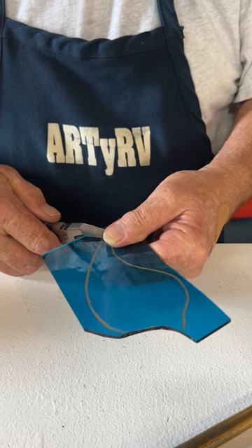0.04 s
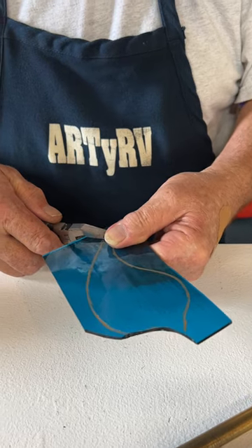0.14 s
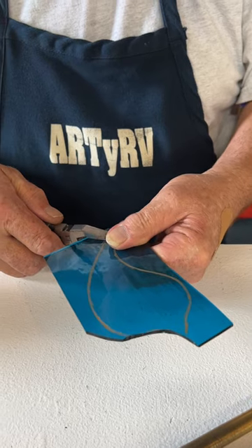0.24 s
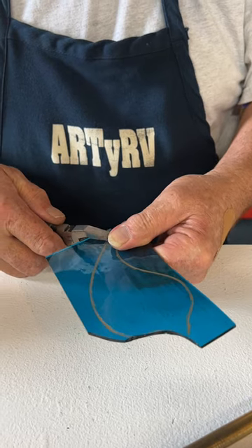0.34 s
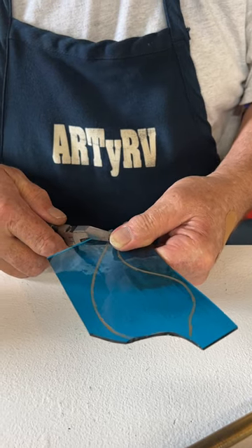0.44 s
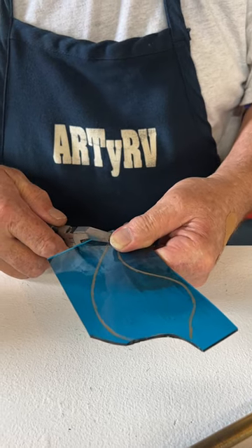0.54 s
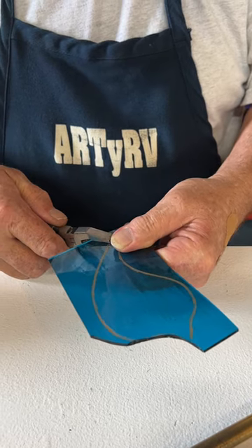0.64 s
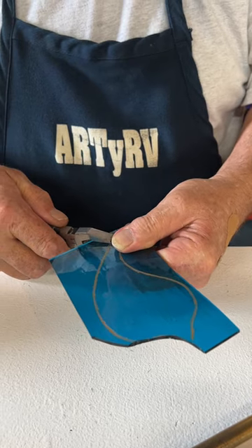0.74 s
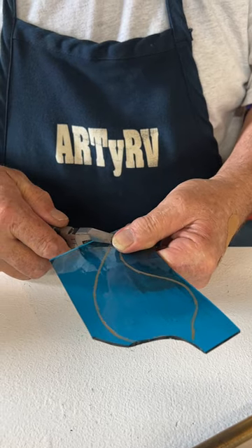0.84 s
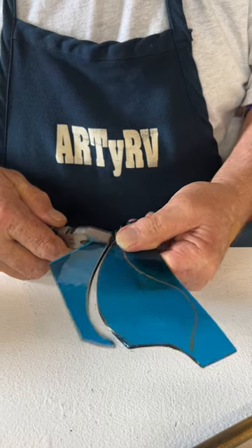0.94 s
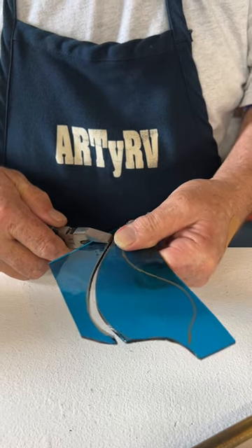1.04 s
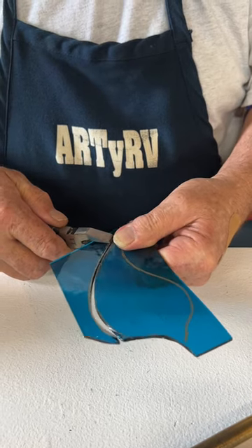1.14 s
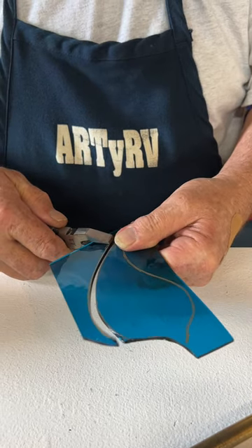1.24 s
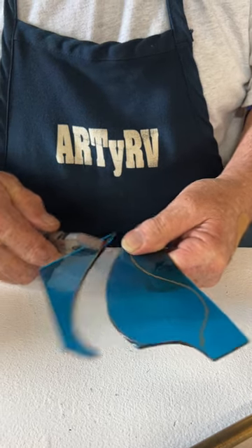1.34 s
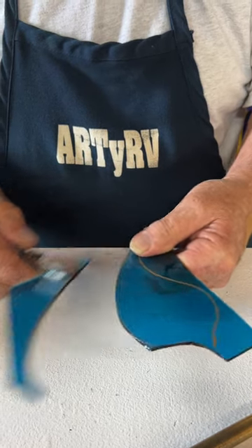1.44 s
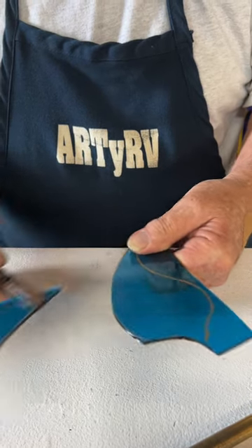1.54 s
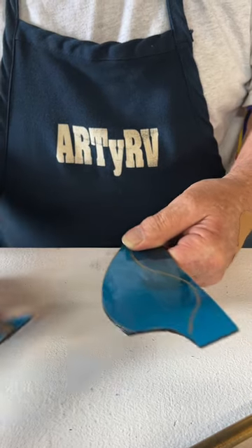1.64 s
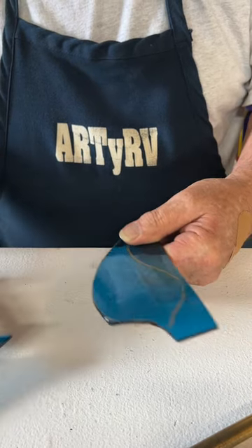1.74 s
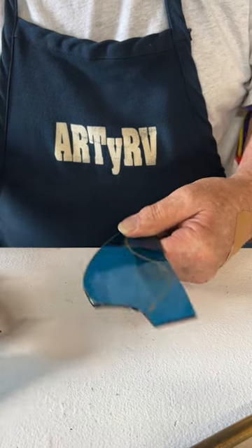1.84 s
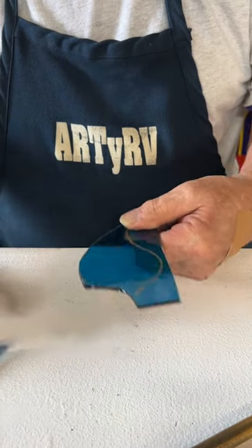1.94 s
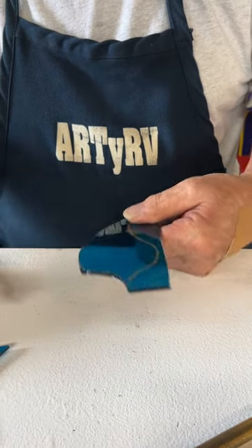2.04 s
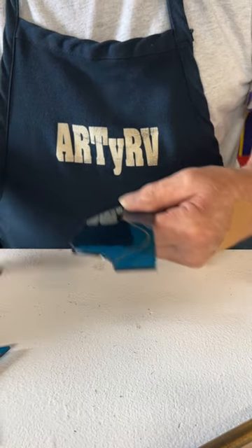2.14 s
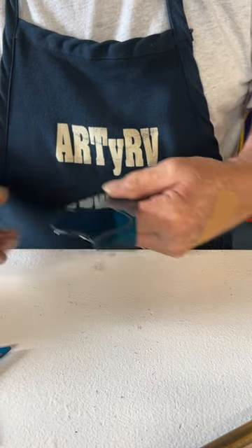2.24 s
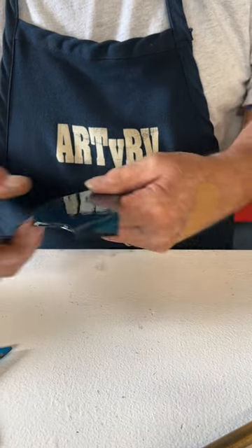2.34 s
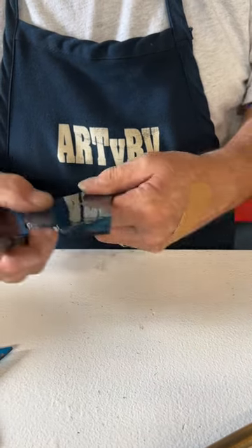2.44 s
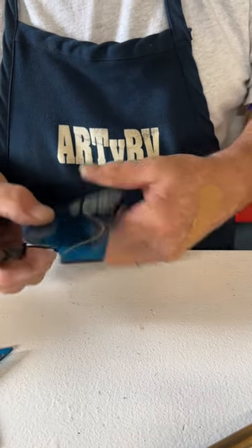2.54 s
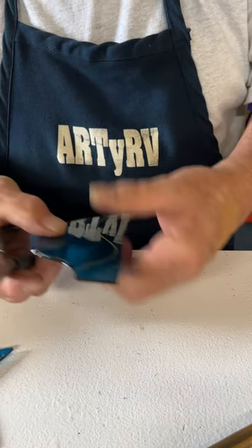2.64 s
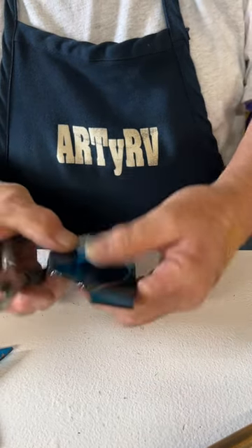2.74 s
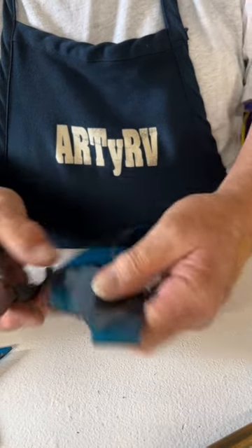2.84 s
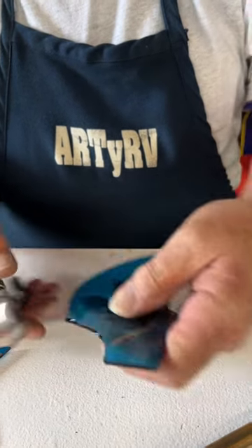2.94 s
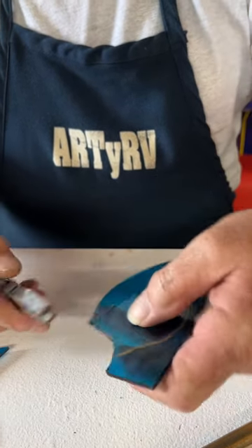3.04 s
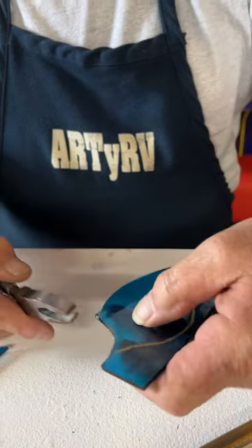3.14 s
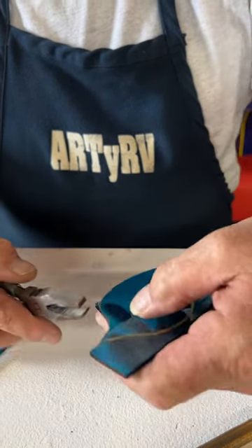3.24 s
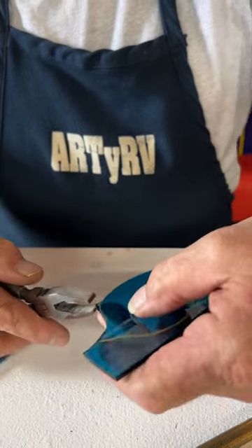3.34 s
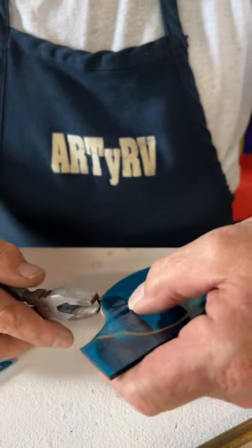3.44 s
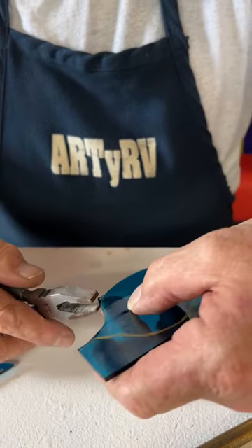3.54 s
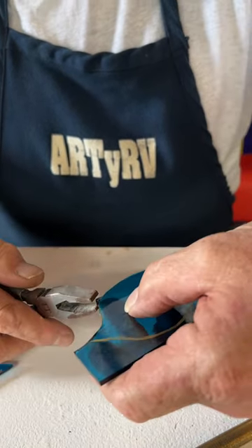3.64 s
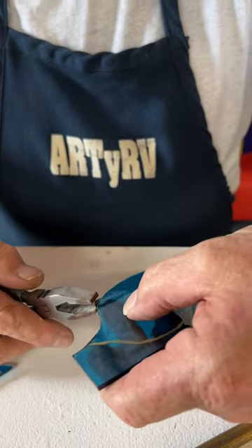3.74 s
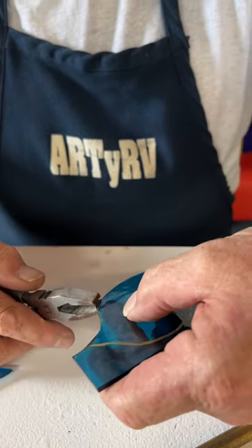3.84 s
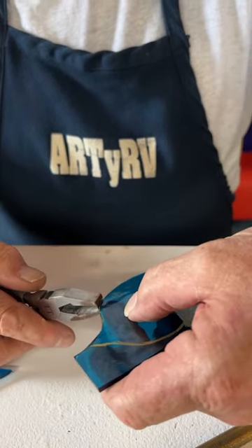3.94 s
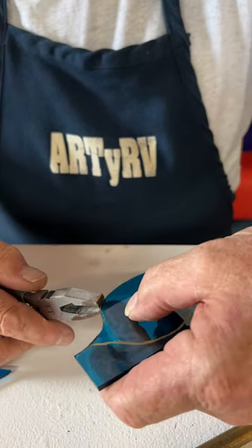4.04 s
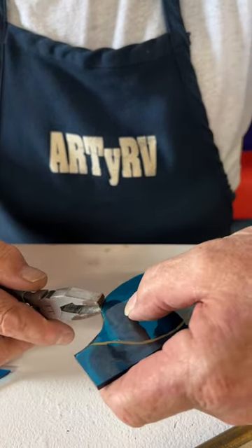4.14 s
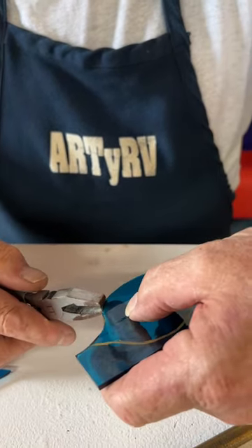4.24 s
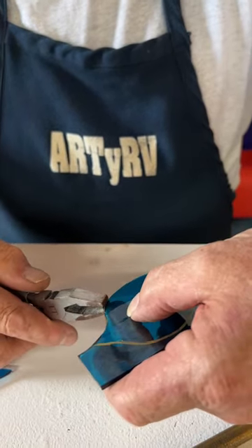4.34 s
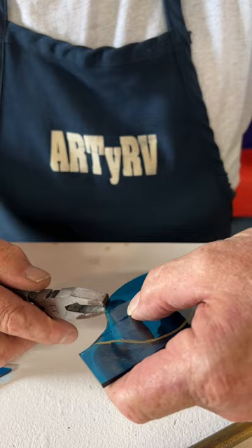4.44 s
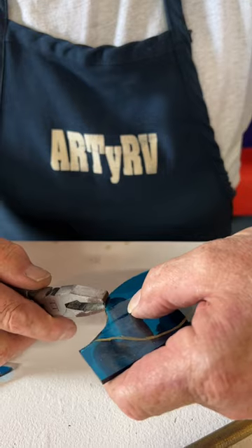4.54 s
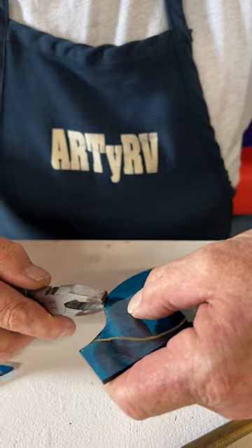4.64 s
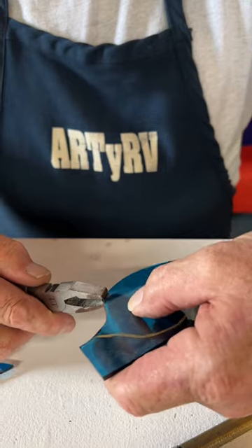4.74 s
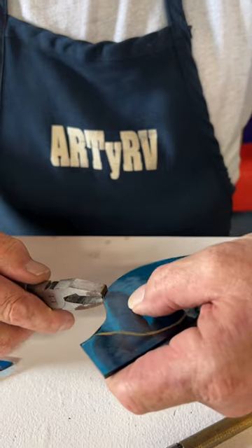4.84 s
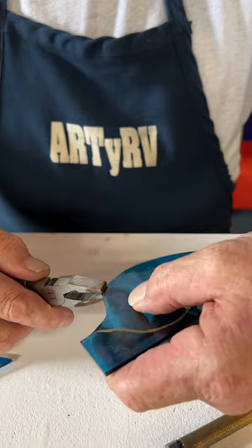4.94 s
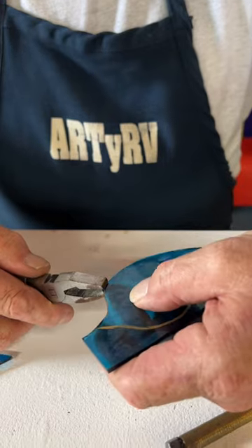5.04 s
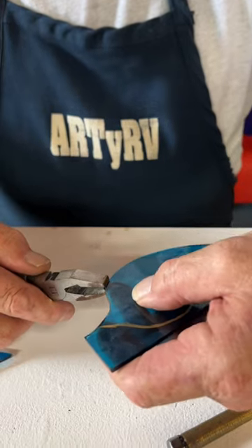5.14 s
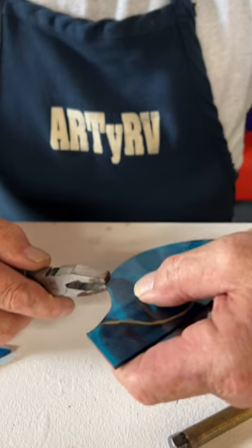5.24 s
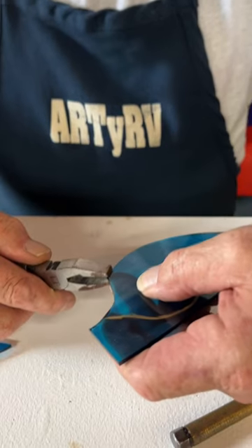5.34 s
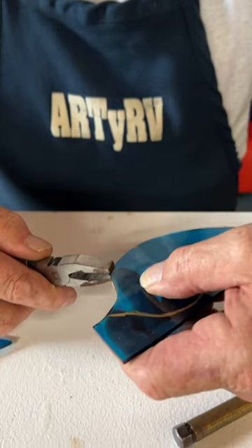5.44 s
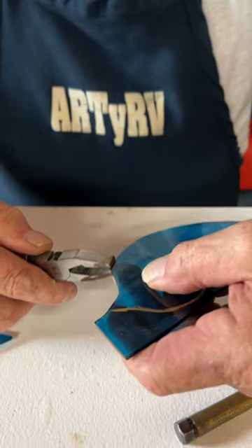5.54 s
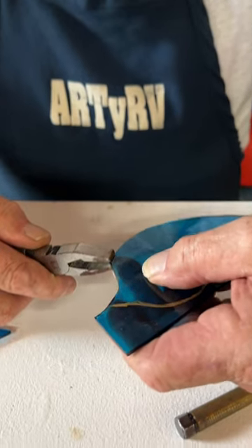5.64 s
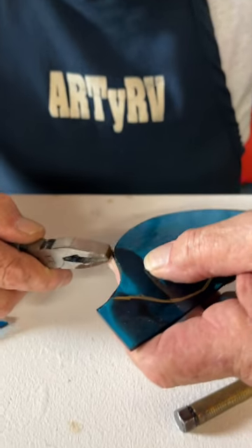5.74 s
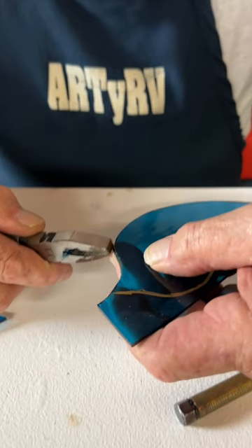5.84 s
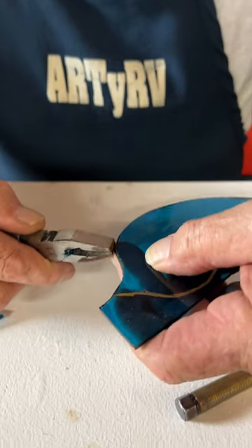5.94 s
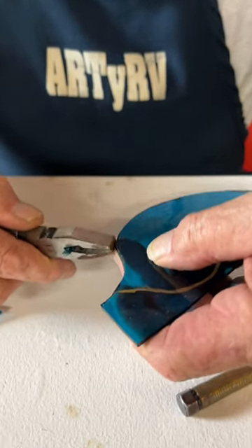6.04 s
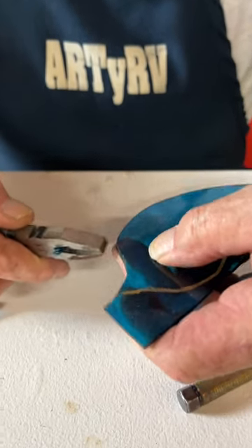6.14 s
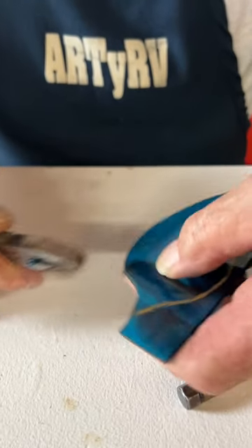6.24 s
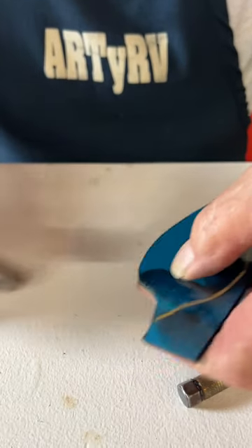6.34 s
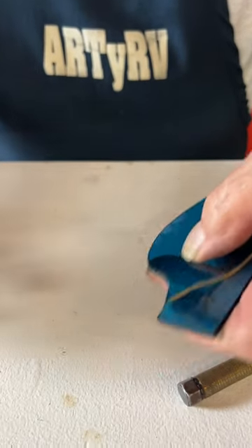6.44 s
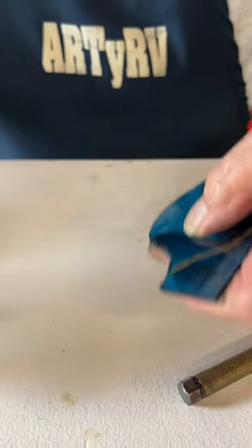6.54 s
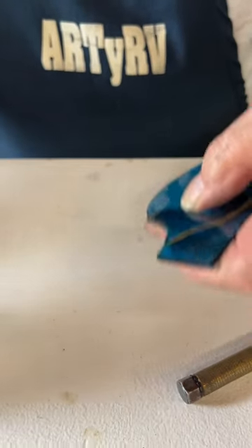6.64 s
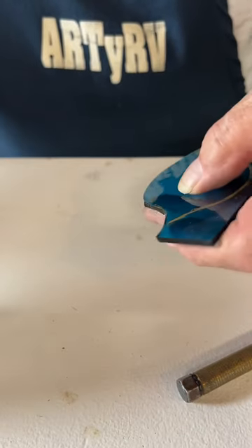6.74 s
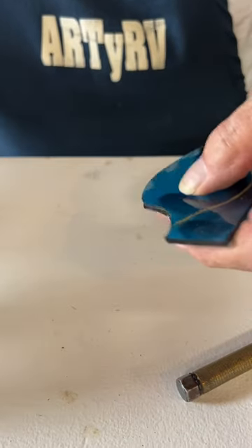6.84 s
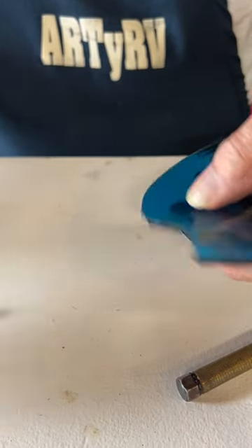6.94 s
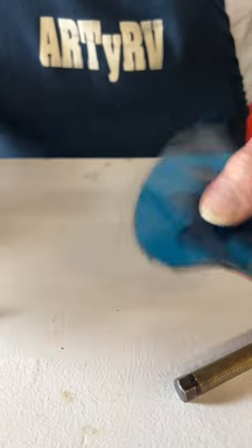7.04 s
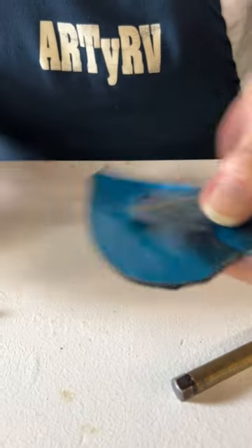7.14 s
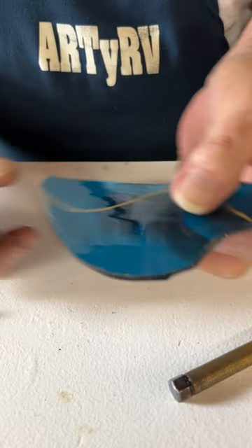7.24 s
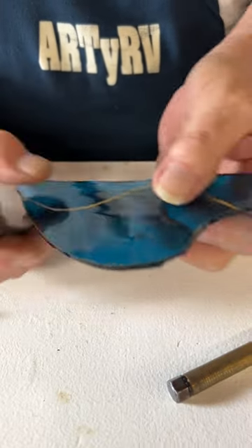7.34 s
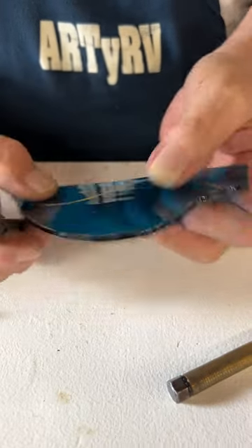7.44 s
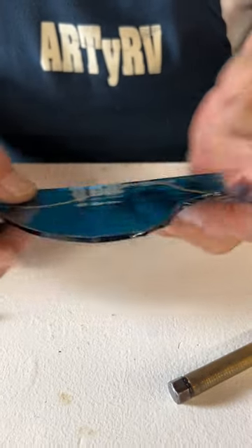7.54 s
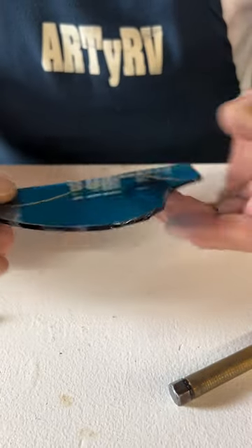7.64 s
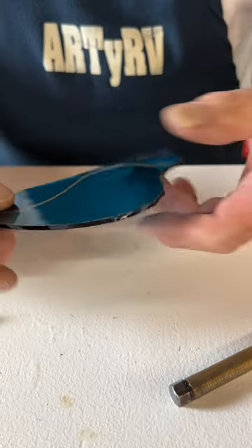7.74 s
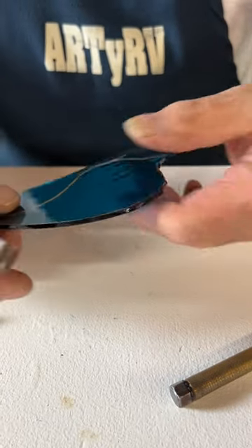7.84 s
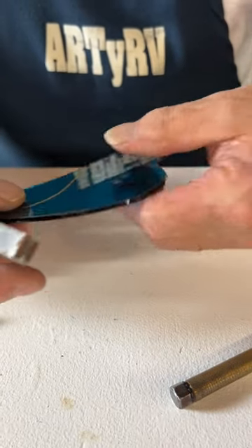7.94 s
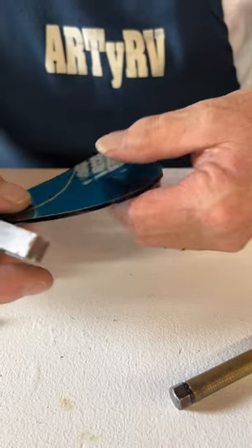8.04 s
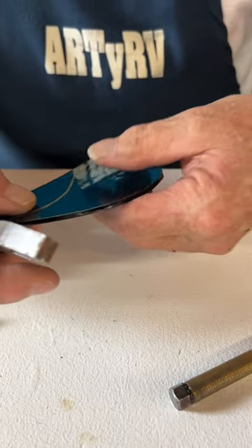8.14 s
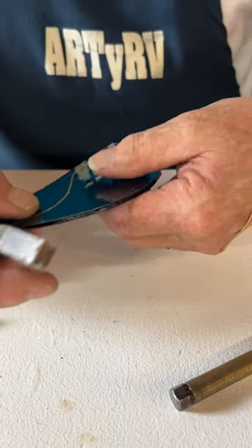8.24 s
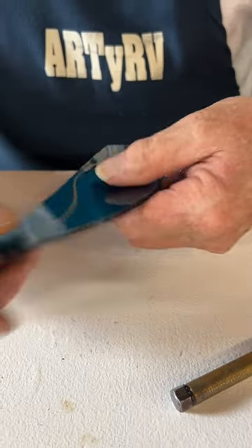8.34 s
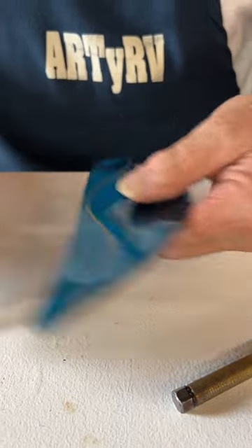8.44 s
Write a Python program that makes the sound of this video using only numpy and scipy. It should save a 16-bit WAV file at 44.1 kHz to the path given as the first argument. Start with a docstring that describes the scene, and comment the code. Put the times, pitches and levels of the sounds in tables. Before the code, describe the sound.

Over a low room rumble, a glass sheet snaps, pliers clatter onto a table, then a sharper crack breaks off a corner and splinters tick.

```python
"""Over a low studio rumble a splinter ticks, then a sheet of stained glass is snapped along its score with pliers.
The pliers clatter onto a work table and fingers rub the glass; a second pair nibbles the edge, and a hum climbs.
A corner cracks off, the second pair slides shut and is laid down, splinters skip about and fingers rub again.
Glass and steel are bursts of spiky noise plus dying tones; the board adds lower tones; rubbing is grainy noise.
Each tool blow is one handle then the other, shared between steel and board by how flat it lands; bounces follow."""
import sys
import numpy as np
from scipy import signal
from scipy.fft import rfft, irfft, next_fast_len
from scipy.io import wavfile
from scipy.ndimage import map_coordinates

SR = 44100
rng = np.random.default_rng(int(sys.argv[2]) if len(sys.argv) > 2 else 0)


def unload_audio(sound):
    """Save the sound as a 16-bit wav file, at the path given as the first command line argument."""
    columns = np.transpose(np.atleast_2d(sound))
    # keep every value between -1 and 1, then stretch to whole-number steps
    steps = np.round(np.clip(columns, -1, 1) * 32767)
    wavfile.write(sys.argv[1], SR, steps.astype(np.int16))


N = 374850  # length in samples
TOP_HZ = 16500  # upper edge of the sound

# Levels and ring times in the tables are starting points: the functions trim, tilt or scale them.
# Low steady rumble: pitch_hz, level_db (per Hz, relative)
RUMBLE_SPECTRUM = [(18, -42), (28, -25.5), (40, -6), (55, -2.5), (125, -1), (240, -6), (310, -18.5),
                   (500, -25), (1000, -35), (2000, -41.5), (4000, -46), (9000, -47), (13000, -61.5),
                   (16000, -71)]
# Path of the faint hum: time_s, pitch_hz, level_db
HUM_PATH = [(4.25, 150.6, -61.5), (4.499, 150, -53), (4.95, 160.8, -52.5), (5.1, 163, -60.5),
            (5.35, 169.1, -54), (5.502, 172.5, -73)]
# Reverberation of the studio: pitch_hz, decay_s (time to fall 60 dB)
ROOM_DECAY = [(120, 0.45), (500, .75), (1000, .85), (1700, .9), (2500, 0.91), (5500, .63), (9000, 0.62),
              (13000, .3)]
# Tone colour of the reverberation: pitch_hz, level_db
ROOM_COLOUR = [(120, 5), (500, 2), (1000, 1.5), (1600, 0.5), (2600, -3), (3600, -3), (5000, -2),
               (10500, -2.5), (12500, -3.5), (15000, -4)]
# Echoes from near surfaces: delay_s, level_db
WALL_ECHOES = [(0.0127, -18.5), (.0245, -30), (.029, -23), (.052, -40.5)]
# How alike left and right are in diffuse sound: pitch_hz, likeness (no unit, 1 = same)
LEFT_RIGHT_LIKENESS = [(100, .989), (250, .95), (600, 0.3), (1400, .4), (2500, 0.35), (5500, .55),
                       (10000, 0.3)]
# Level difference of the microphone ports: pitch_hz, left_minus_right_db
PORT_LEVEL = [(250, 0.3), (620, 3.3), (1200, 1.1), (3000, .7), (6000, 0.56), (10000, .1)]
# Phase difference of the microphone ports: pitch_hz, left_lead_rad
PORT_LEAD = [(200, 0), (700, .2), (2500, 0), (5500, -.95), (9000, -1.3), (15000, -1.55)]

# Air moved by the swaying glass: pitch_hz, level_db (per Hz, relative)
SWAY_SPECTRUM = [(20, -26), (45, -2.5), (75, 0.5), (160, -3.5), (300, -22.5), (1000, -90)]
SWAY_START_S, SWAY_LENGTH_S, SWAY_DB = .885, .33, -51.5

# Fingers slide on the glass: start_s, length_s, hiss_db, ring_db
FINGER_RUBS = [(2.42, 0.21, -70, -68), (2.52, 0.52, -71.5, -81), (3.191, 0.29, -67, -72),
               (4.679, .32, -81, -100), (6.97, 0.15, -68.5, -52), (7.218, 0.28, -72.5, -80),
               (7.87, 0.22, -84.5, -81), (8.25, 0.095, -77, -71), (8.41, .09, -83, -76)]
# A tight grip squeaks: start_s, length_s, pitch_hz, level_db
FINGER_SQUEAKS = [(2.47, 0.18, 1032, -67), (3.2, 0.12, 4950, -65), (6.99, 0.18, 1528, -70),
                  (8.26, 0.11, 1007, -72)]
# The second pliers' jaws slide shut: start_s, length_s, hiss_db, ring_db
JAW_SLIDES = [(6.06, 0.19, -62, -60.5)]
# The jaws scrape: start_s, length_s, pitch_hz, level_db
JAW_SCRAPES = [(6.125, 0.061, 1580, -54)]
# Hiss of a rubbed surface: pitch_hz, level_db (per Hz, relative)
RUB_SPECTRUM = [(300, -35), (1500, -5.5), (3000, 0), (5000, -5.5), (9000, -3), (11000, -3.5), (12300, -52),
                (14800, -8), (16000, -41)]
# Tones of the hand-held glass: pitch_hz, level_db, ring_s (time to fall 60 dB)
HELD_GLASS_TONES = [(2630, -1, 0.011), (3968, -10, 0.061), (5020, 3.5, 0.016), (5220, -14.5, 0.015),
                    (5820, -5, 0.031), (7970, 4, 0.015), (8680, 5, 0.0077), (11050, -8, .012),
                    (14700, -15, 0.014)]

# Splinters click off the edge and skip about: start_s, level_db, treble_db
SPLINTER_TICKS = [(0.6715, -45, 21), (2.5042, -39.5, 8), (2.6708, -52, -39), (3.2004, -48, -32),
                  (4.6815, -41, 1), (6.4928, -22.5, -21), (6.5012, -19.5, 0), (6.541, -30, -13.5),
                  (6.559, -27.5, -61), (6.6177, -25, -22), (6.6659, -31, -30)]
# Splinter tick: pitch_hz, level_db (per Hz, relative)
TICK_SPECTRUM = [(200, -11.5), (900, 0), (2700, -2), (4000, 3), (7000, 1), (10500, 0.5), (12500, -9),
                 (16000, -9)]
# The last crumbs: start, typical spacing, first level and loss per hop
SKITTER_START_S, SKITTER_GAP_S, SKITTER_DB, SKITTER_LOSS_DB = 6.646, .032, -38, 6.5

# First pliers tumble onto the table or stir when it is bumped:
# start_s, steel_db, table_db, flatness (no unit, 0 = on a tip, 1 = flat)
PLIERS_BLOWS = [(1.27, -56, -46, .9), (1.6875, -18.5, -24, 1), (1.716, -16, -29, 0.49),
                (1.7195, -16.5, -27, 0.81), (1.778, -23.5, -30.5, 0.025), (1.809, -21, -30.5, 0.073),
                (1.825, -21, -23.5, 0.32), (1.838, -17.5, -31, .05), (1.861, -23, -26.5, 0.077),
                (1.9232, -24, -25, 0.45), (1.9325, -13.5, -32.5, 0.19), (1.9365, -17.5, -32.5, .3),
                (1.984, -15, -21, .75), (4.571, -50, -45.5, 0.88)]
# Second pliers jerk down as the corner gives and are later laid down: same columns
NIPPER_BLOWS = [(5.7105, -18, -26, 0.89), (5.743, -23, -31, .6), (5.7495, -18.5, -35, .9),
                (6.207, -43.5, -43, 0.57), (6.2184, -37, -36.5, 0.84), (6.2439, -21.5, -31.5, 0.53)]
# First pliers rock to rest: start_s, steel_db, table_db, flatness (no unit, 0-1), first_bounce_s
PLIERS_SETTLE = [(1.999, -25, -24, .5, .027), (3.301, -48.5, -36, 0.46, .031)]
# Second pliers rock to rest: same columns
NIPPER_SETTLE = [(6.251, -29.5, -31, 0.79, .017)]
# Steel tones of the first pliers: pitch_hz, level_db, ring_s
PLIERS_TONES = [(2550, -13, .14), (2930, -20, .08), (3905, -19, .1), (5210, -8, .13), (6178, 0, .2),
                (8160, -3, .16), (8820, -17, .07), (9353, -2, .15), (10506, -7, .11), (12888, -7, .13),
                (14600, -9, .14)]
# Steel tones of the second pliers: same columns
NIPPER_TONES = [(2590, -7, .08), (3950, -15, .05), (5750, -13, .09), (6210, -4, .13), (6322, 0, .19),
                (8290, -8, .12), (10580, -7, .11), (13080, -9, .11), (14700, -16, .1)]
# Table top under a hard blow: pitch_hz, level_db, ring_s
KNOCK_TONES = [(360, -3, 0.084), (463, -2, 0.07), (620, -3.5, 0.065), (674, 1.5, 0.08), (806, -1.5, 0.037),
               (920, -8, 0.038), (1309, -7.5, 0.035), (1568, -8.5, 0.026), (1750, -5, 0.031),
               (2030, -6.5, 0.036)]
# Table top under a heavy blow: same columns
THUMP_TONES = [(138.4, -4, .12), (179.5, -0.5, .1), (260.1, -1, 0.12), (306.7, -4.5, 0.084)]
# Click of steel on the table: pitch_hz, level_db (per Hz, relative)
CLICK_SPECTRUM = [(20, -45), (100, -9), (500, 4), (1500, -4), (3000, -3.5), (4200, -1), (7000, -1.5),
                  (10500, -2), (12000, -13.5), (15000, -16.5), (16500, -27)]
BOUNCE_SHRINK, BOUNCE_LOSS_DB = .8, 5  # each bounce against the last: length factor, level loss
# The other handle follows each blow: typical delay, its random spread (log scale), level change
HANDLE_LAG_S, HANDLE_LAG_SCATTER, HANDLE_DB = .0098, .12, -7.5
# On a tip the steel rings louder but a little shorter, and the board hardly moves: dB, length factor, dB
TIP_RING_DB, TIP_RING_LENGTH, TIP_THUMP_DB = 5, 0.58, -14.5
# Landing flat the steel rings more weakly but a little longer, and the board thumps harder: same units
FLAT_RING_DB, FLAT_RING_LENGTH, FLAT_THUMP_DB = -10.5, 0.7, 0

# The jaws bite the gripped piece: start_s, crack_db, ring_db, ring_length (factor), treble_tilt_db
EDGE_BITES = [(3.7046, -36, -37.5, 0.98, -18), (3.709, -52.5, -38.5, 0.61, -30),
              (3.982, -54, -47, 0.57, -47), (5.6868, -5, -5.5, 0.89, 2.5), (5.6905, -26, -17.5, 0.6, -3)]
# The sheet parts and its halves touch: same columns
SHEET_BREAK = [(.8826, -15, -28, .5, 2), (.885, -10, -15.5, .9, -2), (1.064, -34, -44, .7, -9),
               (1.066, -30, -40, .6, -45), (1.269, -58, -62, .4, -22), (1.543, -55, -51, .3, -12)]
# Tones of the gripped piece: pitch_hz, level_db, ring_s
PIECE_TONES = [(2477, -2, 0.03), (2780, -8, .025), (4920, 3, 0.014), (5700, -8.5, 0.01), (6800, -6, 0.014),
               (7640, -4, .012), (8540, -5.5, 0.02), (11100, -0.5, 0.013)]
# Tones of the sheet: same columns
SHEET_TONES = [(1389, -17.5, .22), (2280, -12, .04), (2402, -9, .06), (2449, 0, .085), (2800, -13, .04),
               (5300, -9, .05), (5398, -3, .1), (5620, -6, .045), (9205, -11, .05), (14900, -20, .12)]
# Cracking glass: pitch_hz, level_db (per Hz, relative)
CRACK_SPECTRUM = [(20, -59.5), (150, -32.5), (500, -21.5), (900, -10.5), (1400, -11), (2500, -8),
                  (3800, -9), (5500, -4.5), (8000, -4), (11000, -2.5), (12500, -14), (15000, -10.5),
                  (16500, -26.5)]


def amp(db):
    """Turn decibels into an amplitude factor."""
    return 10 ** (np.asarray(db) / 20)


def unit(x):
    """Scale a sound to an average (rms) level of 1."""
    return x / np.sqrt(np.mean(x ** 2) + 1e-20)


def along(points, hz):
    """Read a curve of (pitch_hz, value) points, spaced by the logarithm of pitch."""
    f, v = np.transpose(points)
    return np.interp(np.log(hz + 1), np.log(f + 1), v)


def fade(t, t60):
    """Die away smoothly, losing 60 dB in t60 seconds."""
    return np.exp(-np.log(1000) * t / np.maximum(t60, 1e-4))


def filtered(x, response):
    """Multiply the spectrum of a sound by a response to pitch."""
    n = x.shape[-1]
    padded = next_fast_len(n + 8192)
    spectrum = rfft(x, padded) * response(np.fft.rfftfreq(padded, 1 / SR))
    return irfft(spectrum, padded)[..., :n]


def noise(spectrum, size):
    """Make coloured noise with an rms of 1."""
    return unit(filtered(rng.standard_normal(size), lambda hz: amp(along(spectrum, hz))))


def tilted(rows, tilt_db):
    """Tilt a spectrum or set of tones by an amount that reaches tilt_db at TOP_HZ."""
    return [(hz, db + tilt_db * hz / TOP_HZ, *rest) for hz, db, *rest in rows]


def add(track, s, sound):
    """Mix a sound into the track at time s."""
    part = track[max(round(s * SR), 0):][:len(sound)]
    part += sound[:len(part)]


def ages():
    """Time since a contact, for the third of a second that it sounds."""
    return np.arange(SR // 3) / SR


def burst(spectrum, t60, spiky_db=6.5):
    """An impact of sharp, uneven noise spikes that starts near rms 1 and dies at once."""
    shape = fade(ages(), t60)
    unevenness = amp(spiky_db * rng.standard_normal(len(shape)))
    spikes = rng.standard_normal(len(shape)) * unevenness
    coloured = filtered(spikes * shape, lambda hz: amp(along(spectrum, hz)))
    return unit(coloured) * np.sqrt(np.mean(shape ** 2))


def ring(modes, length, attack, scatter_db, detune=0):
    """Dying tones of joint rms 1; each contact mixes them anew and may shift them a little."""
    hz, db, t60 = np.transpose(modes)[:, :, None]
    t = ages()
    size = amp(db + scatter_db * rng.standard_normal(hz.shape))
    hz = hz * (1 + detune * rng.standard_normal(hz.shape))
    waves = np.sin(2 * np.pi * (hz * t + rng.random(hz.shape))) * fade(t, t60 * length)
    level = np.sqrt(2 / np.sum(size ** 2))
    onset = 1 - np.exp(-t / attack)
    return (size * waves).sum(0) * level * onset


def wobble(t, rate):
    """A random curve of straight lines between rate points a second."""
    return map_coordinates(rng.standard_normal(len(t)), [t * rate], order=1)


def stroke(t, length):
    """A hand movement swells and dies away."""
    return np.sin(np.pi * np.clip(t / length, 0, 1) ** .8)


def diffuse(pair):
    """Blend two unrelated signals into left and right with the wanted likeness at each pitch."""
    def shares(hz):
        turn = np.arccos(np.clip(along(LEFT_RIGHT_LIKENESS, hz), -1, 1)) / 2
        return np.array([np.cos(turn), np.sin(turn)])
    mid, side = filtered(pair, shares)
    return np.array([mid + side, mid - side])


def studio(x, wet_db, walls_db, build=0.024):
    """The direct sound, a few near echoes, and a noise tail that dies at its own pace at each pitch."""
    hz, t, z = signal.stft(rng.standard_normal((2, SR)), SR, nperseg=256)
    decay = fade(t, along(ROOM_DECAY, hz)[:, None])
    buildup = 1 - np.exp(-(t / build) ** 2)
    tail = signal.istft(z * decay * buildup, SR, nperseg=256)[1]
    tail = diffuse(tail / np.linalg.norm(tail[0]))
    tail = filtered(tail, lambda f: amp(along(ROOM_COLOUR, f)))
    near = x.copy()
    for delay, db in WALL_ECHOES:
        add(near, delay, amp(db + walls_db) * x)
    return near + amp(wet_db) * signal.fftconvolve(x[None], tail, axes=1)[:, :N]


def background(rumble_db=-56.5, hum_db=-1):
    """Steady low noise makes the rumble; for a while a faint sine hum climbs in pitch."""
    t = np.arange(N) / SR
    s, hz, db = np.transpose(HUM_PATH)
    swell = np.interp(t, [s[0] - .2, *s, s[-1] + .2], [0, *amp(db + hum_db), 0])
    hum = swell * np.sin(2 * np.pi * np.cumsum(np.interp(t, s, hz)) / SR)
    rumble = diffuse(np.array([noise(RUMBLE_SPECTRUM, N), noise(RUMBLE_SPECTRUM, N)]))
    return amp(rumble_db) * rumble + hum


def sway():
    """A soft low flutter of air as the freed half of the sheet swings in the hand."""
    out, t = np.zeros(N), np.arange(SR // 2) / SR
    air = stroke(t, SWAY_LENGTH_S) * noise(SWAY_SPECTRUM, len(t))
    add(out, SWAY_START_S, amp(SWAY_DB) * air)
    return out


def friction(strokes, modes, grain_db, slips_per_s):
    """A surface sticks and slips: a grainy hiss, and rough noise that excites the body's tones."""
    out, t = np.zeros(N), np.arange(SR // 2) / SR
    for s, length, hiss_db, ring_db in strokes:
        slips = stroke(t, length) * unit(amp(grain_db * wobble(t, slips_per_s)))
        body = ring(modes, 0.53, attack=0.0019, scatter_db=6.5)
        push = stroke(t, length) * slips * rng.standard_normal(len(t))
        rung = signal.fftconvolve(push, body / np.linalg.norm(body))
        add(out, s, amp(hiss_db) * slips * noise(RUB_SPECTRUM, len(t)))
        add(out, s, amp(ring_db) * rung)
    return out


def squeaks(strokes, width, grain_db, slips_per_s):
    """Slips that lock to one pitch: a narrow noise band squeaks, a wide one scrapes."""
    out, t = np.zeros(N), np.arange(SR // 2) / SR
    for s, length, pitch_hz, db in strokes:
        hiss = rng.standard_normal(len(t))
        band = unit(filtered(hiss, lambda hz: 1 / (1 + ((hz / pitch_hz - 1) / width) ** 2)))
        grain = unit(amp(grain_db * wobble(t, slips_per_s)))
        add(out, s, amp(db) * stroke(t, length) * grain * band)
    return out


def skitter(treble_db=-25, unevenness=0.17, count=4):
    """The last crumbs hop at uneven gaps, ever more weakly: rows like the splinters'."""
    gaps = SKITTER_GAP_S * np.exp(unevenness * rng.standard_normal(count))
    return [(SKITTER_START_S + gaps[:k].sum(), SKITTER_DB - k * SKITTER_LOSS_DB, treble_db)
            for k in range(count)]


def splinters(gain_db=-7, t60=0.016, tilt=0.45, usual_db=-18):
    """Tiny dry noise ticks, each with its own brightness."""
    out = np.zeros(N)
    for s, db, treble_db in SPLINTER_TICKS + skitter():
        colour = tilted(TICK_SPECTRUM, tilt * (treble_db - usual_db))
        add(out, s, amp(db + gain_db) * burst(colour, t60))
    return out


def contact(s, steel_db, table_db, flatness):
    """Share out a blow by flatness: start, ring dB, ring length factor, click dB, knock dB, thump dB."""
    def between(tip, flat):
        return np.interp(flatness, [0, 1], [tip, flat])
    ring_db = steel_db + between(TIP_RING_DB, FLAT_RING_DB)
    length = between(TIP_RING_LENGTH, FLAT_RING_LENGTH)
    thump_db = table_db + between(TIP_THUMP_DB, FLAT_THUMP_DB)
    return s, ring_db, length, steel_db, table_db, thump_db


def tumble(blows, settles, count=5):
    """List a tool's contacts: one handle then the other, and ever quicker, weaker bounces to rest."""
    out = []
    for s, steel_db, table_db, flatness in blows:
        lag = HANDLE_LAG_S * np.exp(HANDLE_LAG_SCATTER * rng.standard_normal())
        out.append(contact(s, steel_db, table_db, flatness))
        out.append(contact(s + lag, steel_db + HANDLE_DB, table_db + HANDLE_DB, flatness))
    for s, steel_db, table_db, flatness, flight in settles:
        for k in range(count):
            loss = k * BOUNCE_LOSS_DB
            out.append(contact(s, steel_db - loss, table_db - loss, flatness))
            s += flight * BOUNCE_SHRINK ** k
    return out


def chatter(sound, share, t60, per_s=260):
    """The loose joint strikes again and again just after a blow, roughening its sound."""
    t = ages()
    hits = rng.random(len(t)) < per_s / SR
    taps = hits * rng.standard_normal(len(t)) * fade(t, t60) * share
    taps[0] = 1  # the blow itself
    rough = signal.fftconvolve(sound, taps)[:len(t)]
    return rough * np.linalg.norm(sound) / np.linalg.norm(rough)


def clatter(contacts, modes, click_t60):
    """Steel hits the table: clicks, and apart from them the tool's ring with the board's knock and thump."""
    clicks, body = np.zeros((2, N))
    for s, ring_db, length, click_db, knock_db, thump_db in contacts:
        click = amp(click_db) * burst(CLICK_SPECTRUM, click_t60)
        steel = amp(ring_db) * ring(modes, length, attack=0.00036, scatter_db=3, detune=.0022)
        knock = amp(knock_db) * ring(KNOCK_TONES, 0.96, attack=0.00093, scatter_db=3, detune=0.035)
        thump = amp(thump_db) * ring(THUMP_TONES, 0.81, attack=0.0014, scatter_db=.5, detune=0.021)
        add(clicks, s, chatter(click, share=0.4, t60=0.08))
        add(body, s, chatter(steel, share=0.36, t60=0.1) + knock + thump)
    return clicks, body


def tool(blows, settles, modes, click_t60, click_wet_db, body_wet_db, walls_db):
    """Pliers in the room: clicks, and the steel's ring with the board, each with its own reverberation."""
    clicks, body = clatter(tumble(blows, settles), modes, click_t60)
    return studio(clicks, click_wet_db, walls_db) + studio(body, body_wet_db, walls_db)


def fractures(events, modes, crack_t60):
    """A running crack lets go of the bent glass: a spiky burst, and tones that soon die in the hand."""
    out = np.zeros(N)
    for s, crack_db, ring_db, length, tilt_db in events:
        crack = burst(tilted(CRACK_SPECTRUM, tilt_db), crack_t60)
        glass = ring(tilted(modes, tilt_db), length, attack=0.00018, scatter_db=1.0)
        add(out, s, amp(crack_db) * crack)
        add(out, s, amp(ring_db) * glass)
    return out


def scene():
    """Place every source in the studio and mix them."""
    fingers = friction(FINGER_RUBS, HELD_GLASS_TONES, grain_db=4.0, slips_per_s=150)
    fingers += squeaks(FINGER_SQUEAKS, width=0.0082, grain_db=1.5, slips_per_s=80)
    jaws = friction(JAW_SLIDES, NIPPER_TONES, grain_db=4.5, slips_per_s=85)
    jaws += squeaks(JAW_SCRAPES, width=1.0, grain_db=1.5, slips_per_s=286)
    small = studio(splinters() + fingers + jaws, wet_db=-18.5, walls_db=-3.5)
    nippers = tool(NIPPER_BLOWS, NIPPER_SETTLE, NIPPER_TONES, click_t60=.024,
                   click_wet_db=-18.5, body_wet_db=-20.5, walls_db=-4)
    pliers = tool(PLIERS_BLOWS, PLIERS_SETTLE, PLIERS_TONES, click_t60=0.026,
                  click_wet_db=-12.5, body_wet_db=-18.5, walls_db=-1)
    bites = fractures(EDGE_BITES, PIECE_TONES, crack_t60=0.022)
    bites = studio(bites, wet_db=-14.5, walls_db=-10.0, build=0.02)
    snap = fractures(SHEET_BREAK, SHEET_TONES, crack_t60=0.015)
    snap = studio(snap, wet_db=-13, walls_db=-2)
    return background() + sway() + small + nippers + pliers + bites + snap


def record(dry):
    """Two close microphone ports differ in level and phase; tall peaks are rounded and the top is cut."""
    sides = np.array([[.5], [-.5]])  # half of each difference goes to either side

    def port_response(hz):
        return amp(sides * along(PORT_LEVEL, hz)) * np.exp(1j * sides * along(PORT_LEAD, hz))
    ports = filtered(dry, port_response)
    rounded = ports / (1 + (ports / .76) ** 6) ** (1 / 6)  # stays below .76
    return filtered(rounded, lambda hz: 1 / (1 + (hz / TOP_HZ) ** 160))


dry = scene()
out = record(dry)
unload_audio(out)
```